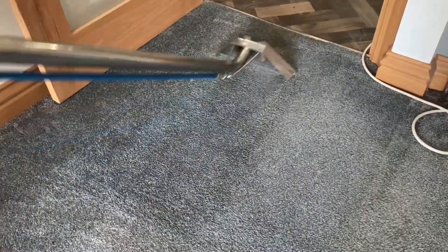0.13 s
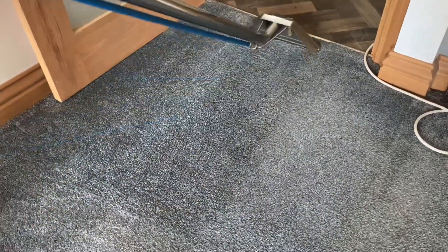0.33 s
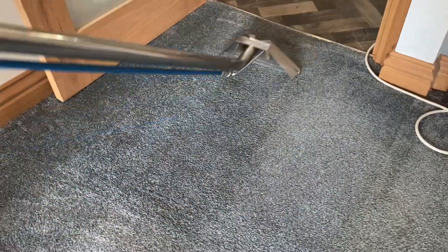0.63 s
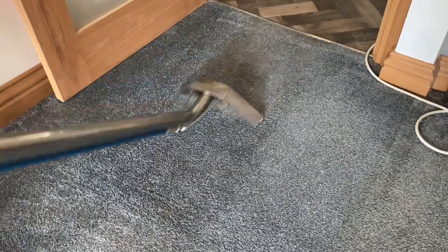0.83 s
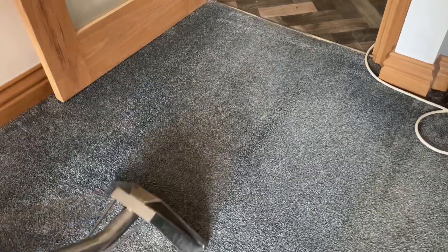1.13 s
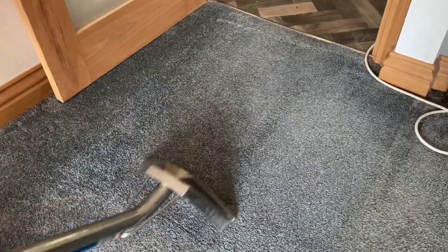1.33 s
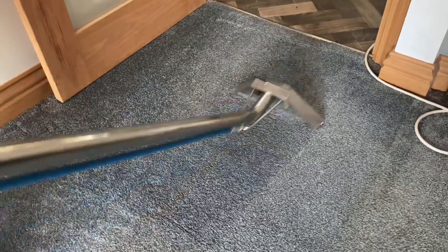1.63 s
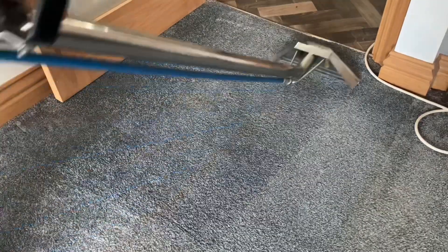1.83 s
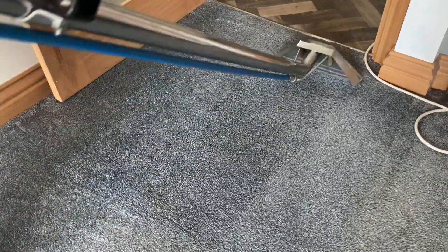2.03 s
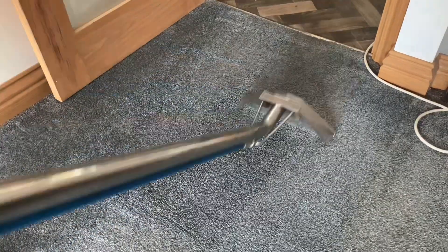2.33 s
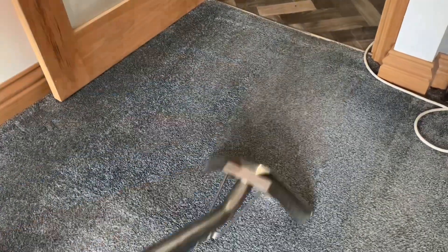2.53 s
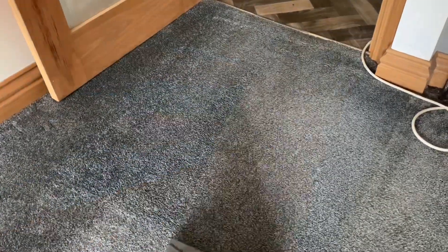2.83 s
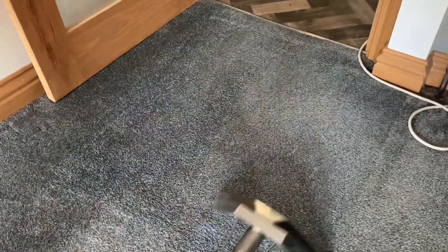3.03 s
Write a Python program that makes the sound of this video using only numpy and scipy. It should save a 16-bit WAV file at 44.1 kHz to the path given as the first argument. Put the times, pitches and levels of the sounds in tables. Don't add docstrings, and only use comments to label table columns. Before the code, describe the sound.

Steady loud suction motor in a small furnished room, close stereo pickup: rushing air, piercing thin whine, hollow hose resonance, then wand strokes brushing carpet, low shudders, a deep thud midway and a scuff near the end.

```python
import sys
import numpy as np
from scipy import signal
from scipy.fft import rfft, irfft
from scipy.io import wavfile

SR = 44100
rng = np.random.default_rng(int(sys.argv[2]) if len(sys.argv) > 2 else 0)


def amplitude_ratio(level_db):
    exponent = np.asarray(level_db, float) / 20
    return 10 ** exponent


def to_wav(s):
    ch = np.atleast_2d(s).T
    pcm = np.round(np.clip(ch, -1, 1) * 32767)
    wavfile.write(sys.argv[1], SR, pcm.astype(np.int16))


N = 141120
NEAR_LEAD_S = 0.00013

# (time [s], level [dB])
WAND_PRESSURE = [(0, -39), (.12, -39), (.33, -57.5), (.55, -42), (.8, -38.5), (.92, -35), (.97, -38.5),
                 (1.02, -31), (1.07, -40.5), (1.17, -52), (1.35, -35), (1.41, -35.5), (1.45, -33.5),
                 (1.52, -38.5), (1.72, -38.5), (1.84, -54), (2.26, -45), (2.52, -40.5), (2.7, -44),
                 (2.84, -46), (2.92, -34), (3.0, -39.5), (3.2, -40)]


def rms_one(x):
    return x / np.sqrt(np.mean(x ** 2) + 1e-20)


def in_time(rows):
    time_s, *columns = np.transpose(rows)
    return [np.interp(np.arange(N) / SR, time_s, column) for column in columns]


def at_hz(points, hz):
    point_hz, value = np.transpose(points)
    return np.interp(np.log(hz), np.log(point_hz), value, right=value[-1])


def drift(rate_hz):
    step = 40
    pole = np.exp(-2 * np.pi * rate_hz * step / SR)
    white = rng.standard_normal(N // step + 2002)
    slow = signal.lfilter([1], [1, -2 * pole, pole ** 2], white)[2000:]
    return np.interp(np.arange(N) / step, np.arange(len(slow)), rms_one(slow - slow.mean()))


def stereo_white(lead_s):
    # (frequency [Hz], power share [0-1])
    likeness = [(60, .97), (180, .97), (350, .93), (700, .6), (1500, .58), (3000, .5), (6000, .35),
                (9000, .68), (10300, .93), (11800, .83), (13500, .95)]
    # (frequency [Hz], level [dB])
    balance = [(60, -2), (300, 1.5), (600, -3), (1200, 0.7), (2500, 0.6), (5500, 0.5), (9000, -4.5),
               (13000, 1.5)]
    hz = np.maximum(np.arange(N // 2 + 1) * SR / N, 1)
    common, left, right = rfft(rng.standard_normal((3, N)))
    share = np.clip(at_hz(likeness, hz), 0, 1)
    common = np.sqrt(share) * common
    own = np.sqrt(1 - share)
    turn = np.exp(1j * np.pi * hz * lead_s)
    tilt = amplitude_ratio(at_hz(balance, hz) / 2)
    return irfft([(common * turn + own * left) * tilt, (common / turn + own * right) / tilt], N)


def shaped_white(spectrum, lead_s):
    bins = rfft(stereo_white(lead_s))
    hz = np.maximum(np.arange(bins.shape[1]) * SR / N, 1)
    return irfft(bins * amplitude_ratio(at_hz(spectrum, hz)), N)


def banded(spectrum, lead_s, patchy_db, own_db):
    together = drift(6.0)
    edges_hz = 24 * 2 ** np.arange(0, 9.6, .5)
    noises = [shaped_white(spectrum, lead_s) for _ in range(2)]
    out = 0
    for k, (low_hz, high_hz) in enumerate(zip(edges_hz, edges_hz[1:])):
        band_pass = signal.butter(2, [low_hz, high_hz], "band", fs=SR, output="sos")
        band = signal.sosfilt(band_pass, noises[k % 2])
        out = out + band * amplitude_ratio(patchy_db * together + own_db * drift(13.4))
    return rms_one(out)


def tone(hz, smear_hz, fading_db, turn_rad):
    phase = 2 * np.pi * np.cumsum(hz + smear_hz * drift(150.0)) / SR
    sides = []
    for side in (1, -1):
        fading = amplitude_ratio(fading_db * drift(22.0))
        shift_rad = side * (turn_rad + .4 * drift(14.0)) / 2
        sides.append(fading * np.sin(phase + shift_rad))
    return np.sqrt(2) * np.array(sides)


def motors():
    # (time [s], frequency [Hz])
    whine_pitch = [(0, 4094), (.55, 4092), (.7, 4072), (.95, 4076), (1.2, 4060), (1.45, 4044), (1.7, 4068),
                   (1.95, 4074), (2.4, 4040), (2.8, 4026), (3.2, 4030)]
    # (time [s], level [dB])
    whine_level = [(0, -12), (.11, -2), (.15, 2), (.3, 6.5), (.5, 10), (.57, 2.5), (.68, -5), (.84, -2),
                   (.92, 6), (.99, -9), (1.05, 6), (1.13, -8), (1.19, 4.5), (1.3, 7.5), (1.36, -4),
                   (1.42, 10), (1.5, -2), (1.76, -0.5), (1.86, 5.5), (2.2, 0), (2.38, 1), (2.45, 6.5),
                   (2.53, -6), (2.65, 5), (2.74, -1), (2.93, 6), (2.99, -7), (3.045, 7.5), (3.2, 2)]
    # (time [s], frequency [Hz], level [dB])
    shaft_hum = [(0.0, 450, -33), (0.31, 452, -45.5), (0.8, 453, -39), (0.89, 454, -29), (0.96, 450, -45),
                 (1.04, 445.7, -37), (1.15, 448.3, -37.5), (1.5, 448.6, -34), (1.97, 449.5, -40),
                 (2.58, 448.4, -32.5), (2.67, 445, -40), (3.0, 446.8, -32.5), (3.2, 448, -41.5)]
    # (multiple of shaft [1], level [dB], smear [Hz], fading [dB], phase between sides [rad])
    fan_tones = [
        (9, -45, 10, 1.2, 1.8),
        (10, -58, 18, 3.5, 1),
        (11, -52.5, 9, 4, 1.4),
        (17, -55, 65, 2.5, 1.2),
        (18, -50.5, 55, 2.5, 1.6),
    ]
    blades = 9
    blade_hz, = in_time(whine_pitch)
    blade_db, = in_time(whine_level)
    hum_hz, hum_db = in_time(shaft_hum)
    out = amplitude_ratio(hum_db) * tone(hum_hz, smear_hz=1.5, fading_db=1.5, turn_rad=.5)
    for multiple, db, smear_hz, fading_db, turn_rad in fan_tones:
        level_db = db + blade_db * (multiple == blades)
        out = out + amplitude_ratio(level_db) * tone(blade_hz * multiple / blades, smear_hz, fading_db, turn_rad)
    return out


def room(x):
    t60_s, echo_db, wall_cut_hz = .12, -9, 6000
    t = np.arange(int(t60_s * SR)) / SR
    echoes = rng.standard_normal(len(t)) * amplitude_ratio(-60 * t / t60_s)
    echoes *= amplitude_ratio(echo_db) / np.sqrt(np.sum(echoes ** 2))
    echoes = signal.lfilter(*signal.butter(1, wall_cut_hz, fs=SR), echoes)
    echoes[0] = 1
    return rms_one(signal.fftconvolve(x, echoes[None])[:, :N])


def dulling(roar):
    treble_hz, start_db, sag_db_per_s = 7500, 2, 1.24
    top = signal.sosfiltfilt(signal.butter(2, treble_hz, "high", fs=SR, output="sos"), roar)
    top_db = start_db - sag_db_per_s * np.arange(N) / SR
    return roar + (amplitude_ratio(top_db) - 1) * top


def air():
    # (frequency [Hz], density [dB per Hz])
    air_spectrum = [(500, -47), (1000, 2.5), (1800, -4), (5000, -0.5), (5800, -8), (8100, -3.5), (9000, -9),
                    (15500, -14.5)]
    roar = banded(air_spectrum, lead_s=.000294, patchy_db=.4, own_db=.65)
    return amplitude_ratio(-36.5) * dulling(room(roar))


def boom():
    # (frequency [Hz], density [dB per Hz])
    boom_spectrum = [(25, -9), (60, -5.5), (150, -7.5), (220, -7), (380, -7.5), (480, -12), (650, -23.5),
                     (1000, -89)]
    pressure_db, = in_time(WAND_PRESSURE)
    level_db = -35.5 + 0.28 * (pressure_db - pressure_db.mean())
    return amplitude_ratio(level_db) * banded(boom_spectrum, NEAR_LEAD_S, patchy_db=1.1, own_db=1.1)


def hose():
    # (frequency [Hz], width [Hz], level [dB])
    resonances = [(211.3, 17.3, -40), (285.3, 18, -42.5), (362.6, 17.5, -39), (384, 7.4, -54),
                  (980, 61, -64), (1500, 76, -47), (1694, 9.9, -53.5), (1872, 87, -48.5), (2230, 14, -51.5),
                  (2366, 23, -53), (776, 15, -61.5), (3316, 25, -50), (3416, 28, -51), (4320, 22, -57)]
    white = stereo_white(NEAR_LEAD_S)
    out = 0
    for hz, width_hz, db in resonances:
        pole = np.exp(-np.pi * width_hz / SR)
        ring = signal.lfilter([1, 0, -1], [1, -2 * pole * np.cos(2 * np.pi * hz / SR), pole ** 2], white)
        out = out + amplitude_ratio(db + 2.2 * drift(2.5)) * rms_one(ring)
    return out


def wand():
    # (frequency [Hz], density [dB per Hz])
    pile_spectrum = [(130, -1.5), (250, 0), (450, 4.5), (600, 3.5), (780, -2.5), (1050, 2), (1600, -5),
                     (3000, -11.5)]
    # (frequency [Hz], density [dB per Hz])
    lip_spectrum = [(400, -10), (950, 1), (1400, -3), (2150, 2), (2800, -5), (4300, -6.5), (7000, -20),
                    (11000, -36)]
    # (time [s], level [dB], length [s])
    scuffs = [
        (1.025, -41, .022),
        (2.913, -32, .034),
        (2.97, -41, .03),
        (3.03, -38.5, .025),
        (3.12, -38.5, .025),
    ]
    t = np.arange(N) / SR
    pressure_db, = in_time(WAND_PRESSURE)
    hiss = banded(pile_spectrum, NEAR_LEAD_S, patchy_db=1.5, own_db=1.1)
    hiss = signal.lfilter(*signal.butter(2, 5000, fs=SR), hiss)
    swell = 0
    for time_s, db, length_s in scuffs:
        swell = swell + amplitude_ratio(db) * np.exp(-np.abs((t - time_s) / length_s) ** 2.4)
    scuff = banded(lip_spectrum, 0, patchy_db=.6, own_db=.6) * amplitude_ratio([[1.5], [-1.5]])
    return amplitude_ratio(pressure_db + 4.5) * hiss + swell * scuff


def shudder():
    # (time [s], level [dB], frequency [Hz])
    judder = [(0, -29, 81), (.05, -29.5, 83), (.09, -45, 84.4), (.13, -31.5, 86), (.2, -30, 86),
              (.33, -44.5, 80.8), (.6, -37, 99.6), (.7, -42, 102), (1.0, -40, 106.4), (1.15, -37.5, 118),
              (1.22, -43, 69.8), (1.32, -32, 65.9), (1.41, -35.5, 75.66), (1.5, -28.5, 86),
              (1.56, -31, 93.2), (1.6, -23, 97.1), (1.7, -33, 93.04), (1.75, -26, 83.4), (1.79, -36, 78),
              (2.0, -62, 48.7), (2.15, -32, 49.05), (2.25, -45, 60.43), (2.4, -33.5, 100.6),
              (2.55, -44, 80), (2.75, -30, 49.95), (2.85, -41, 54.65), (2.95, -31, 75.2), (3.0, -29.5, 78),
              (3.15, -31.5, 80.8), (3.2, -34, 82.1)]
    width_hz, steady, turn_rad = 43, 1.03, 0.086
    db, hz = in_time(judder)
    phase = 2 * np.pi * np.cumsum(hz) / SR + turn_rad * np.array([[1], [-1]])
    lumps = (steady + drift(width_hz)) * np.sin(phase) + drift(width_hz) * np.cos(phase)
    return amplitude_ratio(db + 1.47) * rms_one(lumps)


def bumps():
    # (time [s], level [dB], frequency [Hz], length [s])
    knocks = [
        (.06, -34, 140, 0.066),
        (0.607, -32.5, 364.6, 0.068),
        (.68, -37, 214, .05),
        (1.263, -26, 42.5, 0.045),
        (2.107, -37.5, 274.5, 0.084),
        (2.154, -42, 48, 0.033),
        (2.749, -47, 48.02, 0.043),
    ]
    t = np.arange(N) / SR
    out = 0
    for time_s, db, hz, length_s in knocks:
        swell = np.exp(-((t - time_s) / length_s) ** 2)
        out = out + np.sqrt(2) * amplitude_ratio(db) * swell * np.sin(2 * np.pi * hz * (t - time_s))
    return out


def scene():
    return motors() + air() + boom() + hose() + wand() + shudder() + bumps()


def roll_off(x):
    return signal.sosfilt(signal.butter(12, 15670, fs=SR, output="sos"), x)


def record(dry):
    mix = signal.sosfilt(signal.butter(2, 32, "high", fs=SR, output="sos"), dry)
    return roll_off(mix)


dry = scene()
out = record(dry)
to_wav(out)
```